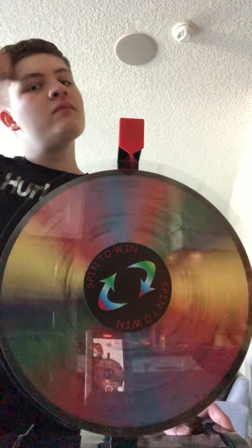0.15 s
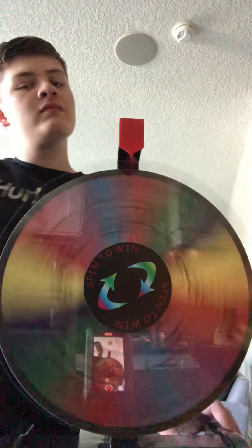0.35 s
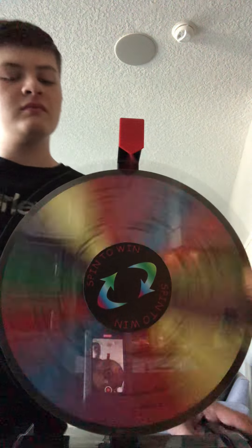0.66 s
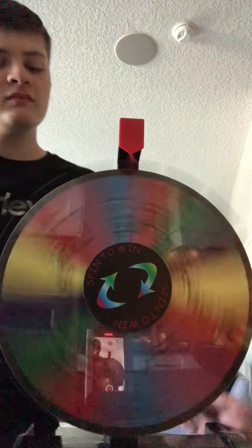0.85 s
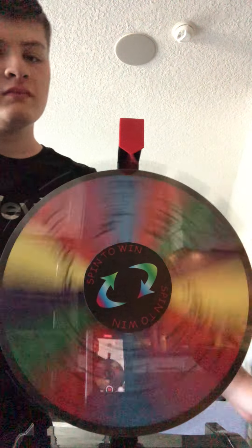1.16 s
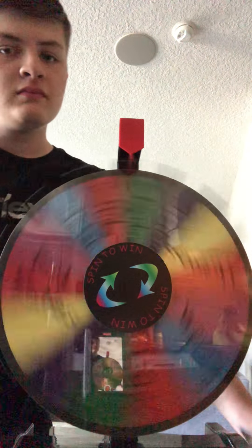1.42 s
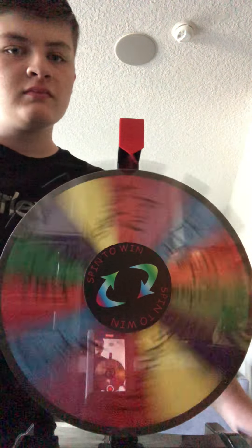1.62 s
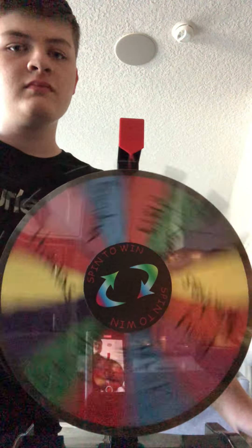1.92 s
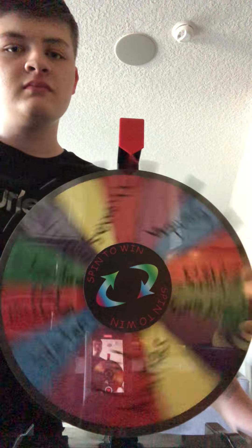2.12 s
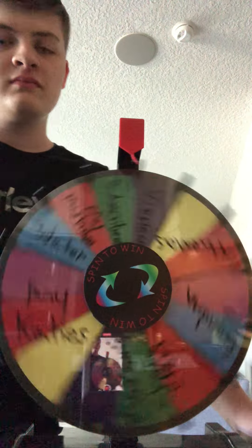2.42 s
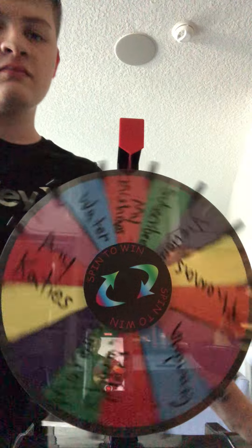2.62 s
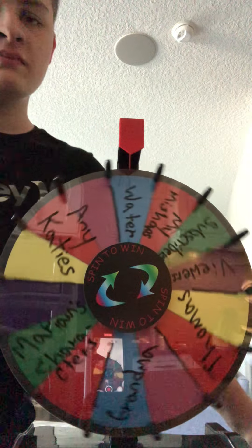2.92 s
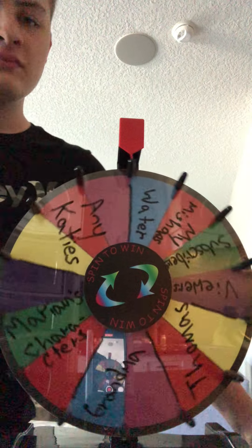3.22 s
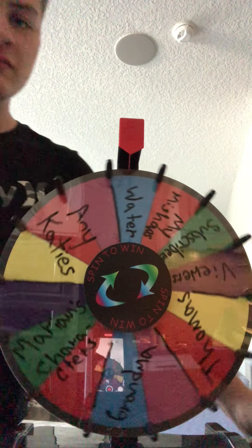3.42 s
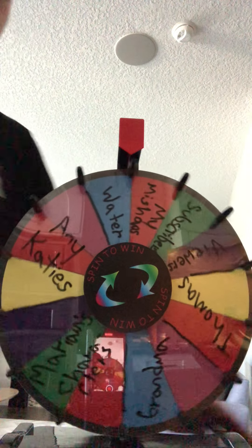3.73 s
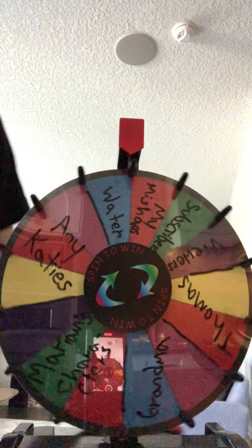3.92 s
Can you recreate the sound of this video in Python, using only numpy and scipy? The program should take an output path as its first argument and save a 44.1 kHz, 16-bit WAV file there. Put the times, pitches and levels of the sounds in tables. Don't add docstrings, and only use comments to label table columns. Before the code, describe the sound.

A tabletop prize wheel, already spinning fast, makes a dense plastic rattle as its flapper snaps over pegs. Over nearly three seconds the ticks spread into separate clacks, ending in one hard, clean snap. A few faint rocking ticks follow. Close mono microphone in a small, quiet, lightly reverberant room, with low stand rumble, ventilation murmur and slight hiss.

```python
import sys
import numpy as np
from scipy import signal
from scipy.fft import rfft, irfft, next_fast_len
from scipy.io import wavfile
from scipy.ndimage import uniform_filter1d

SR = 44100
rng = np.random.default_rng(int(sys.argv[2]) if len(sys.argv) > 2 else 0)


def generate_wav(signal):
    frames = np.transpose(np.atleast_2d(signal))
    scaled = np.clip(frames, -1, 1) * 32767
    pcm = np.round(scaled).astype(np.int16)
    wavfile.write(sys.argv[1], SR, pcm)


def ratio_of_db(decibels):
    return 10 ** (np.asarray(decibels, float) / 20)


N = 179380

START_PEGS_PER_S, PASSES, PEGS = 36.77834, 57, 14


def unit(x):
    return x / np.sqrt(np.mean(x ** 2) + 1e-20)


def along(points, hz):
    point_hz, value = np.transpose(points)
    return np.interp(np.log(hz + 1), np.log(point_hz + 1), value)


def filtered(x, response):
    size = next_fast_len(N + SR // 2)
    hz = np.fft.rfftfreq(size, 1 / SR)
    return irfft(rfft(x, size) * response(hz), size)[..., :N]


def ringing(modes, order=1):
    def response(hz):
        total = 0
        for k, (center, width, db) in enumerate(modes):
            damping = 1j * hz * width
            total = total + (-1) ** k * ratio_of_db(db) * damping / (center ** 2 - hz ** 2 + damping)
        total = total ** order
        return total / np.sqrt(np.mean(abs(total) ** 2))
    return response


def run_down():
    first_s, bite, share = .00176, 22.04934, .0031307
    floor = bite / share
    squared = (START_PEGS_PER_S ** 2 + floor) * (1 - share) ** np.arange(PASSES - 1) - floor
    speed = np.sqrt(squared)
    return first_s + np.append(0, np.cumsum(1 / speed)), np.append(speed, 0)


REBOUND_S = [0, .0022, .0033, .0061, .0095, .0125, .0146, .0166, .0206, .0248]


def blows(times, db, rebound_db, fall_s, rough):
    t = np.arange(256) / SR
    push = np.zeros(256)
    push[round(fall_s * SR)] = 1
    arrive = (times[:, None] + REBOUND_S).ravel()
    size = ratio_of_db(db[:, None] + rebound_db).ravel()
    scrape = t * np.exp(-t / fall_s) * rng.standard_normal((len(arrive), 256))
    scrape /= np.linalg.norm(scrape, axis=1, keepdims=True)
    share = np.clip(rough, 0, 1)
    force = size[:, None] * (np.sqrt(1 - share) * push + np.sqrt(share) * scrape)
    where = np.round(arrive * SR).astype(int)[:, None] + np.arange(256)
    return np.bincount(where.ravel(), force.ravel(), N + 256)[:N]


REBOUND_DB = [0.5, -1, -1, -3, -3.5, -10, -13, -7, -12, -16.5]
BOARD_DB = [0.5, -18, -11, -16, -18, -26, -38.5, -16, -20, -29.5]
# pitch_hz, width_hz, level_db
BOOM = [(300.4, 260, -4.5), (429.7, 105, 5.5), (540.6, 33, -2.5)]
KNOCK = [(706, 143, -4.5), (1057, 157, -3), (1560, 730, -9), (1784, 12, -5), (1892, 47, -10),
         (2370, 220, -2)]
FLAPPER = [(5840, 550, -6.5), (6730, 266, 1.5), (7110, 160, 1), (7750, 320, -4), (7925, 84, 0),
           (8530, 1200, -9)]
EDGE = [(8950, 2500, -9), (11260, 900, -4), (13180, 1200, 2), (15030, 2000, -3.5)]


def strike(contacts, low_modes, high_modes, high_db, fall_s, rough, lively):
    s, ring, boom, knock, flap, edge = np.transpose(contacts)
    db, rebound_db = ring + 19, np.array(REBOUND_DB) / lively
    low_db, high_ring_db = db - 3 - high_db / 2, db - 4 + high_db / 2
    out = filtered(blows(s, db + boom + 4, BOARD_DB, fall_s, 0), ringing(BOOM, order=2))
    out += filtered(blows(s, db + knock, rebound_db * 0.85, fall_s, 0.48), ringing(KNOCK))
    out += filtered(blows(s, low_db, rebound_db, 1.509 * fall_s, rough), ringing(low_modes))
    out += filtered(blows(s, high_ring_db, rebound_db, 1.483 * fall_s, rough), ringing(high_modes))
    out += filtered(blows(s, db + flap - .3, rebound_db, 1.4 * fall_s, rough), ringing(FLAPPER))
    return out + filtered(blows(s, db + edge - .3, rebound_db, 1.3 * fall_s, rough), ringing(EDGE))


# pitch_hz, width_hz, level_db
PEG = [(3011, 63, -3), (3400, 390, -8.5), (3913, 62, 1.5), (4736, 220, -7.5), (5040, 280, -4.5),
       (5327, 197, -6.5)]
PEG_END = [(4257, 200, 4), (4456, 40, -4)]
TIP = [(3260, 660, -4.5), (3923, 140, 6.5), (4680, 130, -16.5), (5500, 610, -7)]
# peg_ring_db, boom_db, knock_db, flapper_ring_db, edge_click_db
FAST_DB = [-25, -29.5, -35, -26.5, -24]
CRAWL_DB = [-21, -34.5, -35.5, -23.5, -27]
SCATTER_DB = [0.78, 1.33, 1, 0.3, .6]
# peg_ring_over_rule_db, upper_over_lower_ring_db, face_tone_db, knock_over_rule_db
LAST_TURN = [(1.5, -0.5, -57, -0.5), (0.5, -4.5, -55, -0.5), (-1.5, -3, -66, 0.5), (-1.5, -3.5, -47.5, 0),
             (-1.5, -3.5, -42, 1), (3, 0.5, -53, 0.5), (1, 5, -62, 1), (-2, -3.5, -46.5, 1.5),
             (-4, -2.5, -50, 1.5), (-1.5, -1.5, -55, -0.5), (1, 2, -50.5, 1.5), (-2, -1, -31, 0.5),
             (-1.5, -0.5, -28, -0.5), (1, 3, -33, 1)]


def snaps():
    s, speed = run_down()
    pace = speed[:, None] / START_PEGS_PER_S
    chance = rng.standard_normal((PASSES, 6))
    db = pace * FAST_DB + (1 - pace) * CRAWL_DB + chance[:, :5] * SCATTER_DB
    high_db = -.5 + 1.3 * chance[:, 5]
    ring_db, high_db[-PEGS:], _, knock_db = np.transpose(LAST_TURN)
    db[-PEGS:, 0] += ring_db
    db[-PEGS:, 2] += knock_db
    releases = np.column_stack([s, db[:, 0], db[:, 1:] - db[:, :1]])
    lively = pace + (1 - pace) * 0.88

    scrapes = releases[1:] + [-.0045, -14.5, -16, 3.5, -25, -16]
    scrapes[-1, 1] -= 9
    running = strike(releases[:-1], PEG, PEG_END, high_db[:-1], 0.000501, 0.72, lively[:-1])
    running += strike(scrapes, TIP, PEG_END, -13.5, .0012, 1.0, 0.44)

    last = releases[-1:] + [-.0007, 1.5, 1, -1.5, 0.5, -3]
    last_end = [(4250, 300, 0), (4380, 45, -9.5)]  # pitch_hz, width_hz, level_db
    return running, strike(last, PEG, last_end, 7, .0008, 0.75, 0.62)


# speed_pegs_per_s, tip_ring_db
CATCH = [(5, -54), (11, -45.5), (16, -41), (22, -37), (27, -34), (31, -32), (33.5, -35.5), (37, -34)]


def catches():
    s, speed = run_down()
    speed, chance = speed[:-1], rng.standard_normal((PASSES - 1, 3))
    ahead = .355 + .02 * chance[:, 0]
    s = s[1:] - ahead / speed
    ring = np.interp(speed, *np.transpose(CATCH)) + 3.5 * chance[:, 1]
    click = -1.5 - 1.4 * chance[:, 1] + 1.9 * chance[:, 2]
    contacts = np.transpose([s, ring + 2.73, 0 * s - 18, 0 * s - 17, .6 * click - 2.5, click - 1.5])
    return strike(contacts, TIP, PEG_END, -7, .0006, 0.87, 0.22)


# start_s, peg_ring_db, flapper_ring_db, click_db
ROCKS = [
    (2.962, -60, -8, -14),
    (3.104, -56.5, -5, -2.5),
    (3.434, -78, 5, 10),
    (3.755, -65.5, -2.5, -6),
    (3.7625, -53.5, 1.5, -2),
]
# start_s, ring_db, boom_db, knock_db, flapper_db, click_db
SETTLE = [
    (3.308, -45.5, -1, -21, -14, -32),
]


def rocking():
    settle = strike(SETTLE, PEG, PEG_END, 9, 0.00078, .8, 0.55)
    dull = filtered(settle, lambda hz: (1 + 1j * hz / 7000) ** -4)
    contacts = np.insert(np.array(ROCKS), [2, 2], -20, axis=1)
    return strike(contacts, TIP, PEG_END, -20.5, 0.00061, 1.0, 0.53) + dull


# (fast_level_db, crawl_level_db, swing_db, loudest_at_peg)
DISC = [((532, 70), (-50, -36, 6.5, 10)), ((703.5, 200), (-45, -40, 6, 5.5)), ((970, 360),
        (-41, -32.5, 2, 11))]


def face():
    s, speed = run_down()
    pace = speed / START_PEGS_PER_S
    tones = [(s[-PEGS:], np.transpose(LAST_TURN)[2], (447, 55))]
    for mode, (fast, crawl, swing, peg) in DISC:
        turn = np.cos(2 * np.pi * (np.arange(PASSES) - peg) / PEGS)
        tones.append((s, pace * fast + (1 - pace) * crawl + swing * turn, mode))
    out = np.zeros(N)
    for at, db, mode in tones:
        out += filtered(blows(at, db + 21.5, BOARD_DB, 0.00061, 0), ringing([(*mode, 0)], order=2))
    return out


# pitch_hz, t60_s
ROOM = [(300, 0.28), (1000, 0.34), (4000, 0.4), (8000, 0.32), (15000, 0.14)]
# pitch_hz, level_db
WET = [(300, -6.5), (1000, -2.5), (4000, -4.5), (8000, -5.5), (10500, 0), (13100, -4), (14500, 2.5),
       (15500, 2)]


def room(x):
    out, step = np.zeros(N + 2 * SR), SR // 8
    for start in range(0, N, step):
        hz, t, z = signal.stft(rng.standard_normal(SR // 2), SR, nperseg=256)
        fade_db = -60 * t / along(ROOM, hz)[:, None]
        lasting = ratio_of_db(fade_db) + ratio_of_db(fade_db / 2.7 - 17.5)
        tail = signal.istft(z * lasting, SR, nperseg=256)[1]
        tail *= 1 - np.exp(-np.arange(len(tail)) / (0.0041 * SR))
        piece = signal.fftconvolve(x[start:start + step], tail / np.linalg.norm(tail))
        out[start:start + len(piece)] += piece
    return filtered(out[:N], lambda hz: ratio_of_db(along(WET, hz) - 5.5))


# start_s, level_db
AXLE = [
    (0, -50.5),
    (.5, -55),
    (1, -55),
    (1.5, -55.5),
    (2, -56.5),
    (2.5, -62),
    (2.9, -60.5),
    (4.07, -93.5),
]
# pitch_hz, width_hz, level_db
STAND = [(79.8, 18, -5.5), (134.6, 44, -16), (176.3, 32, 2.5), (244, 159, -11)]


def axle():
    s, db = np.transpose(AXLE)
    level = ratio_of_db(np.interp(np.arange(N) / SR, s, db))
    return level * unit(filtered(rng.standard_normal(N), ringing(STAND)))


# pitch_hz, density_db_per_hz
AIR = [(15, -86.5), (25, -50.5), (60, -20), (103, -22.5), (138, -4), (167, -9), (273, -7), (584, -14.5),
       (979, -16), (1250, -20.5), (1360, -18.5), (3060, -28), (3600, -31.5), (3910, -30.5), (16500, -61.5)]


def air():
    z = signal.stft(rng.standard_normal(N + 512), nperseg=512)[2]
    patches = uniform_filter1d(uniform_filter1d(rng.standard_normal(z.shape), 5, 0), 12, 1)
    noise = signal.istft(z * ratio_of_db(0.35 * unit(patches)), nperseg=512)[1][:N]
    return ratio_of_db(-53) * unit(filtered(noise, lambda hz: ratio_of_db(along(AIR, hz))))


# pitch_hz, width_hz, level_db
HUM = [(76.6, 9.4, 0), (150, 11, -2.5)]


def hum():
    return ratio_of_db(-66.5) * unit(filtered(rng.standard_normal(N), ringing(HUM, order=2)))


def hiss():
    return ratio_of_db(-87.5) * rng.standard_normal(N)


# pitch_hz, level_db
LAST_BEAM = [(3500, 0.5), (4000, -6), (4300, -9.5), (4600, -6), (5100, 0)]


def scene():
    (running, last), rest, disc = snaps(), rocking(), face()
    running = running + catches()
    beamed = filtered(last, lambda hz: ratio_of_db(1.5 + along(LAST_BEAM, hz)))
    wet = room(running + beamed + ratio_of_db(-5) * disc + ratio_of_db(-5) * rest)
    wheel = running + last + rest + disc + wet + axle()
    return (wheel + air() + hum() + hiss())[None]


def band_limit(x):
    return signal.sosfilt(signal.butter(12, 17160, fs=SR, output="sos"), x)


def record(dry):
    body = filtered(dry, lambda hz: np.clip((15800 + 90 - hz) / 180, 0, 1))
    top = filtered(dry - body, lambda hz: hz < 16550)
    now = np.abs(uniform_filter1d(top ** 2, size=256)) + 1e-14
    before = np.roll(np.abs(uniform_filter1d(top ** 2, size=512)), 450) + 1e-14
    sudden = uniform_filter1d((now > ratio_of_db(26) * before) * 1., size=128)
    return band_limit(body + ratio_of_db(-19) * sudden * top)


dry = scene()
out = record(dry)
generate_wav(out)
```